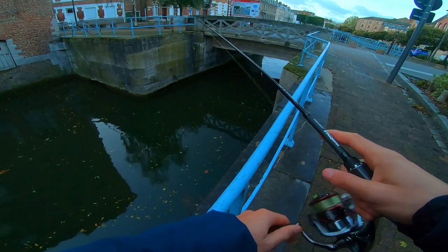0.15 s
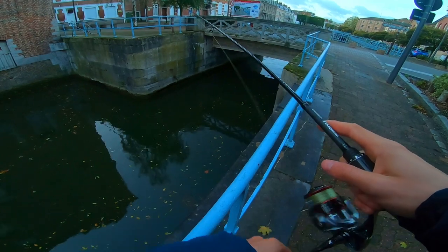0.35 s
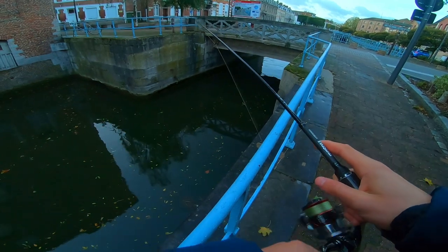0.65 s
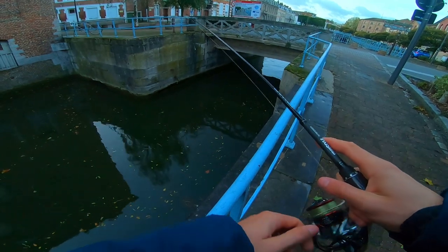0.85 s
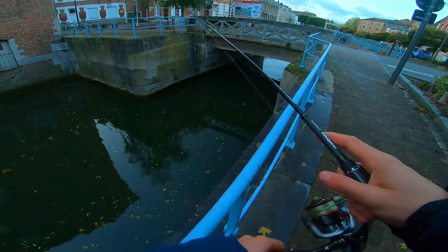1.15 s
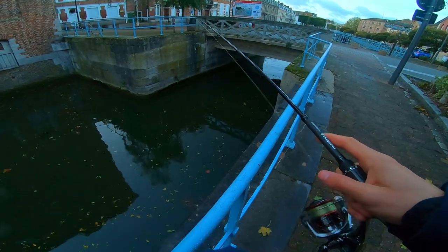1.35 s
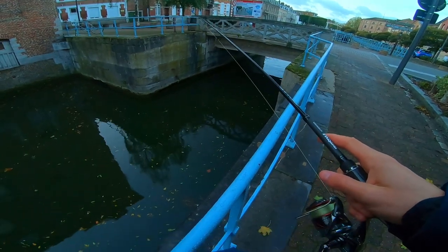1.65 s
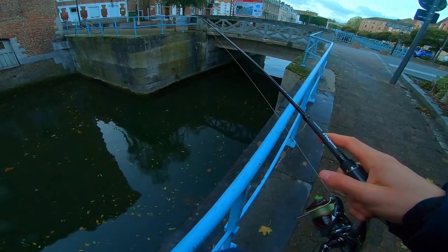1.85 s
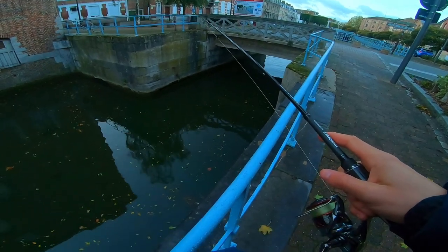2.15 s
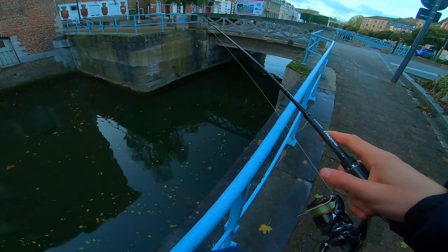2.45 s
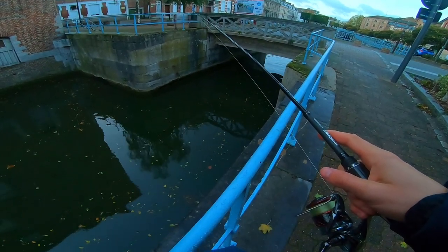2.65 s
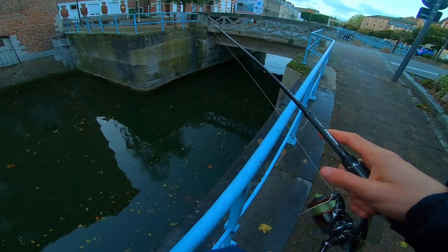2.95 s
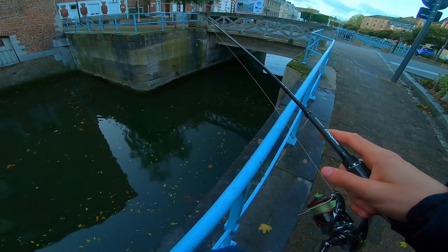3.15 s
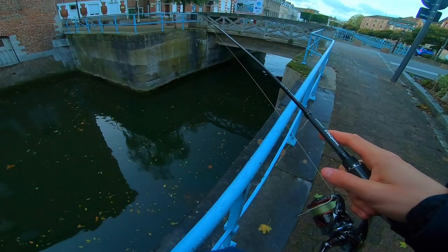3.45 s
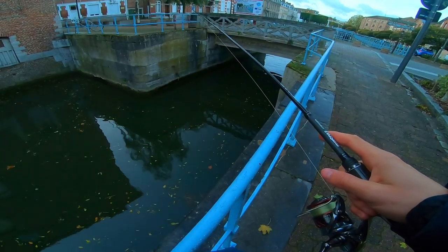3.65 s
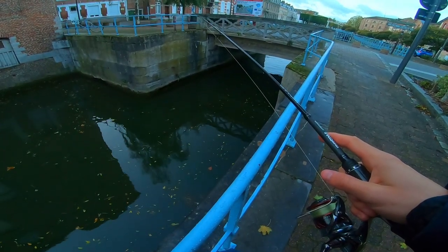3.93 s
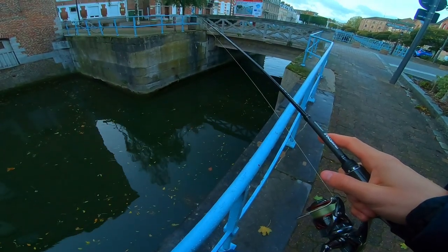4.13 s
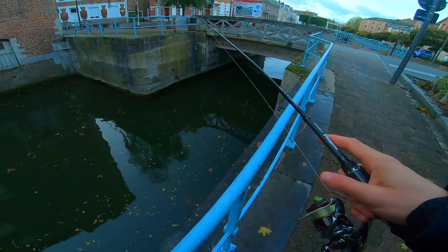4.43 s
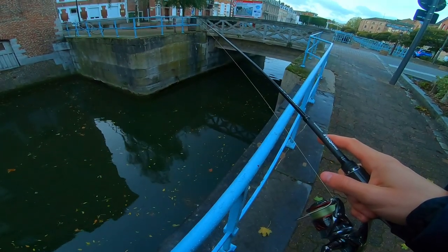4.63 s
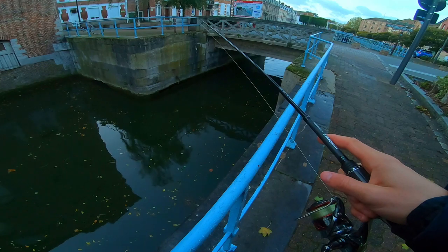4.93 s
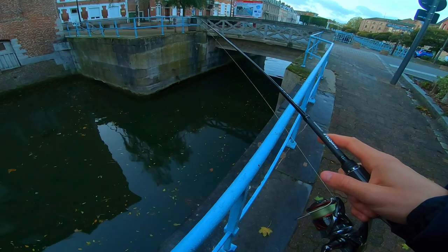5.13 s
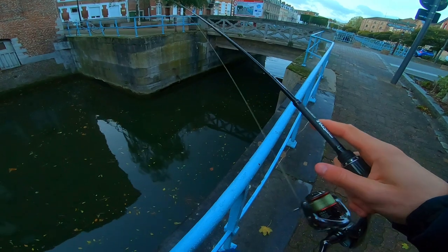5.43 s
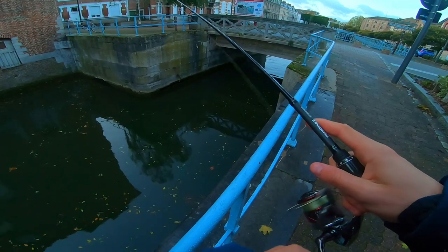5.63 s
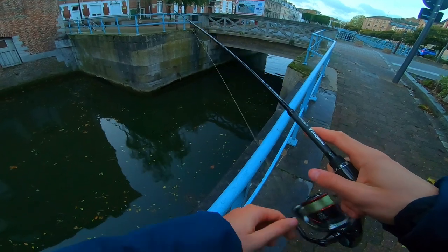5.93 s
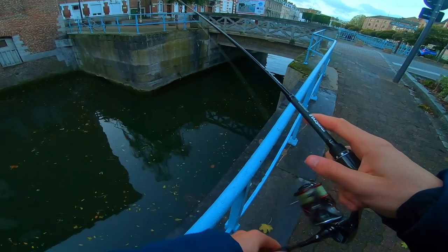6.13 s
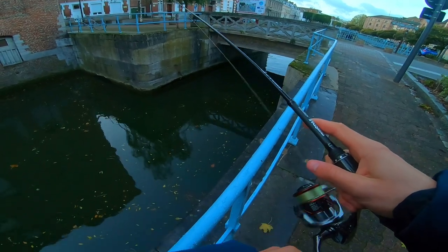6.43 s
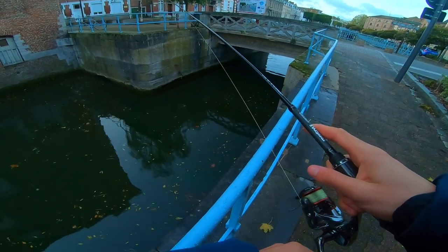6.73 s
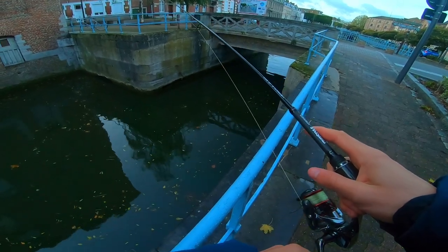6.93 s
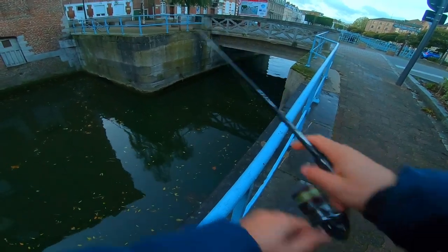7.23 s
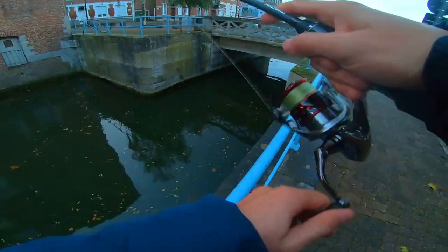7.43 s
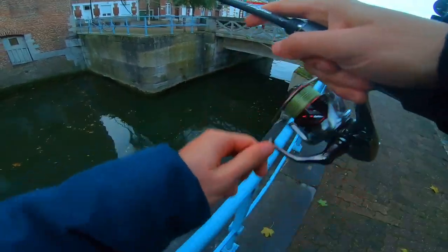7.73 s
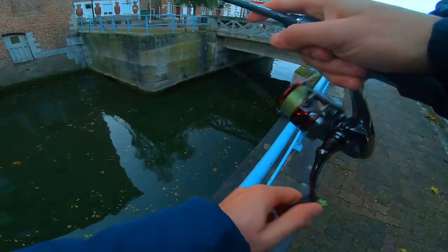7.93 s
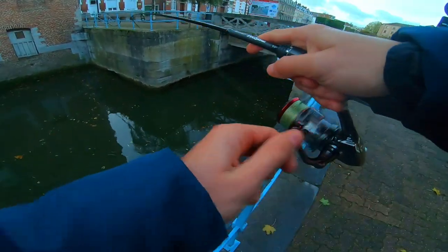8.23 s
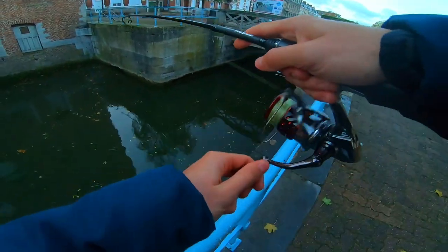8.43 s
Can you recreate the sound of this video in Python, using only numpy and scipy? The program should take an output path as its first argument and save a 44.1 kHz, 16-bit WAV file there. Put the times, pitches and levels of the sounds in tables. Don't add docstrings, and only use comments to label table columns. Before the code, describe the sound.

Outdoor wind buffets the microphone over low traffic rumble while a fishing reel whirs faintly, then rustles, rattles and grinds on a sudden strike.

```python
import sys
import numpy as np
from scipy import signal
from scipy.fft import rfft, irfft
from scipy.io import wavfile
from scipy.ndimage import uniform_filter1d

SR = 44100
rng = np.random.default_rng(int(sys.argv[2]) if len(sys.argv) > 2 else 0)


def dump(signal):
    limited = np.clip(np.atleast_2d(signal).T, -1, 1)
    pcm = np.round(limited * 32767).astype(np.int16)
    wavfile.write(sys.argv[1], SR, pcm)


def decibels_to_gain(level_db):
    exponent = np.asarray(level_db, float) / 20
    return 10 ** exponent


N = 378378
HZ = np.maximum(np.arange(N // 2 + 1) * SR / N, 1)

# frequency in Hz, width in Hz, level in dB.
GEARS = [(2090, 99, -2), (3325, 60, -1.5), (3620, 95, 3.5), (4270, 130, -3), (4630, 50, -7)]
# frequency in Hz, level in dB per Hz.
CRACKLE = [(3000, -19.5), (4500, -2.5), (6000, 1.5), (8500, 0), (10500, -12.5), (13000, -22), (16000, -32)]


def rms_one(x):
    return x / np.sqrt(np.mean(x ** 2) + 1e-20)


def in_time(rows):
    s, *columns = np.transpose(rows)
    return [np.interp(np.arange(N) / SR, s, column) for column in columns]


def within(rows, fade_s):
    t = np.arange(N) / SR
    inside_s = np.minimum(t - rows[0][0], rows[-1][0] - t)
    return np.clip(inside_s / fade_s + 1, 0, 1)


def over_hz(table):
    hz, *columns = np.transpose(table)
    return [np.interp(np.log(HZ), np.log(hz), column) for column in columns]


def drift(rate):
    r = np.exp(-2 * np.pi * rate / SR)
    return rms_one(signal.lfilter([1], [1, -2 * r, r * r], rng.standard_normal(N + SR))[SR:])


def ring(clicks, hz, t60):
    r = decibels_to_gain(-60 / (max(t60, .001) * SR))
    w = 2 * np.pi * hz / SR
    return signal.lfilter([0, np.sin(w)], [1, -2 * r * np.cos(w), r * r], clicks + 1e-18)


def grains(per_s, spread_db):
    sizes = decibels_to_gain(spread_db * np.minimum(rng.exponential(1, N), 5)) * rng.choice([-1, 1], N)
    clicks = rms_one(sizes * (rng.random(N) < per_s / SR))
    return clicks + .5 * rng.standard_normal(N)


def narrow_noise(hz, width_hz):
    lowpass = signal.butter(2, width_hz / 2, fs=SR, output="sos")
    shake = signal.sosfilt(lowpass, rng.standard_normal((2, N)))
    phase = 2 * np.pi * np.cumsum(hz + 0 * shake[0]) / SR
    return np.array([1, 1j]) @ rms_one(shake) * np.exp(1j * phase)


def through_ports(gain, first, second, near=0.):
    # frequency in Hz, likeness from 0 to 1,
    # lead of the right port in radians, left minus right in dB.
    port_pair = [(20, 0.88, 6.28, 0.5), (220, .995, 6.28, 0), (400, .965, 6.3, -.5), (700, 0.78, 6.4, -3),
                 (1000, 0.3, 5.5, 0), (1250, 0.1, 3, -0.5), (1570, 0.64, 0.5, -2.5), (2740, 0.64, 0, -4.5),
                 (4000, 0.75, -0.6, 0), (5200, 0.63, 0.96, -0.5), (6860, 0.25, 0.3, -2),
                 (7500, .42, 2.2, -1), (8480, .38, 1, -3), (9260, 0.1, 2.2, 0.5), (10140, 0.4, -5, 0)]
    alike, lead, balance_db = over_hz(port_pair)
    alike = np.clip(alike + near * (1 - alike) * alike, 0, 1)
    left = rfft(first) * decibels_to_gain(balance_db / 2)
    right = alike * np.exp(1j * lead) * rfft(first) + np.sqrt(1 - alike ** 2) * rfft(second)
    right = right * decibels_to_gain(-balance_db / 2)
    mid = np.sqrt(np.cosh(balance_db * np.log(10) / 20) + alike * np.cos(lead))
    pair = irfft(np.array([left, right]) * gain / mid, N)
    return pair / np.std(pair.mean(axis=0))


def swells(rows, edge_db_per_s):
    s, hold, *levels = np.transpose(rows)[..., None]
    away_s = np.maximum(np.abs(np.arange(0, N, 64) / SR - s) - hold / 2, 0)
    return [decibels_to_gain(db - edge_db_per_s * away_s) for db in levels]


def spread(coarse):
    return np.interp(np.arange(N), np.arange(0, N, 64), coarse)


def level_of(gains, rest_db):
    return 10 * np.log10(spread(np.sum(gains ** 2, axis=0)) + decibels_to_gain(2 * rest_db))


def winding():
    # middle in seconds, hold in seconds, level in dB, top pitch in Hz.
    whistles = [(.15, .01, -67, 7150), (0.189, .02, -59.5, 7800), (.3, 0.0494, -60, 7540),
                (0.4, 0.082, -60, 7250), (0.553, 0.019, -67, 7050), (0.719, 0.05, -67, 7200),
                (.81, .04, -69, 7250), (.86, 0.03, -68, 7500), (0.949, .04, -67, 7440),
                (1.01, .04, -63, 7200), (1.176, 0.09, -66, 7150), (5.569, .02, -65, 8150),
                (5.605, .02, -70, 7500), (5.693, .09, -67, 7050), (5.79, 0.07, -67, 7050),
                (5.88, .04, -68, 7100), (5.98, 0.06, -66.5, 7080), (6.06, .03, -62, 7300),
                (6.105, .02, -64, 8300), (6.135, 0.03, -59.5, 7600), (6.197, .02, -63, 7400),
                (6.25, .03, -64, 7200)]
    # middle in seconds, hold in seconds, level in dB, pitch in
    # Hz.
    rotor_rubs = [(.06, 0.09, -57, 4550), (.21, .04, -61, 4200), (.33, .04, -59.5, 4150),
                  (.73, .04, -56, 4250), (1.14, .02, -62.5, 4450), (1.21, 0.054, -59.5, 4550),
                  (1.28, .06, -57.5, 4480), (1.36, .03, -55, 4400), (1.41, 0.035, -60, 4550),
                  (5.55, 0.046, -64, 4200), (5.77, 0.036, -58.5, 4520), (5.83, .05, -59, 4500),
                  (5.89, .03, -60, 4500), (6.01, 0.029, -58, 4400), (6.06, .04, -59, 4400)]
    # start in seconds, end in seconds.
    turning = [
        (0, 1.5),
        (5.45, 6.35),
    ]
    # frequency in Hz, level in dB per Hz.
    ring_air = [(2500, -28), (4000, 10), (6500, -19), (9000, -14), (10500, -15), (12500, -20), (13200, -50)]
    rest_hz, pitch_law = 7050, 0.67

    air = through_ports(decibels_to_gain(over_hz(ring_air)[0]), grains(2000, spread_db=4.0), grains(2000, spread_db=5.0))

    s, hold, db, top_hz = np.transpose(whistles)
    pulls, = swells(np.transpose([s, hold, db]), edge_db_per_s=169.5)
    tightness = (pulls / decibels_to_gain(db)[:, None]) ** pitch_law
    hz = rest_hz + spread(np.max((top_hz - rest_hz)[:, None] * tightness, axis=0))
    whistle_db = level_of(pulls, rest_db=-79)

    s, hold, db, rub_hz = np.transpose(rotor_rubs)
    rubs, = swells(np.transpose([s, hold, db]), edge_db_per_s=220)
    rub_db = level_of(rubs, rest_db=-71)
    rub_hz = spread(rub_hz[np.argmax(rubs, axis=0)])

    whistle = narrow_noise(hz + 83.0 * drift(39.8), 450.0)
    upper = narrow_noise(8450. + 160.0 * drift(20.0), 300.)
    whistle = whistle + decibels_to_gain(-9 + 3.0 * drift(13)) * upper
    ports = [[.8], [1.74 * np.exp(1j * 2.27)]]
    whistle = decibels_to_gain(whistle_db - 1.5 + 3.4 * drift(55)) * np.real(whistle * ports)
    rub = decibels_to_gain(rub_db - 7.0 + 3.0 * drift(45)) * narrow_noise(rub_hz + 90 * drift(15.0), 260.).real
    rub = rub * decibels_to_gain([[-1.5], [1.5]])
    hush = decibels_to_gain(0.44 * (whistle_db + 55.0) - 68) * air
    turns = sum(within([(start,), (end,)], fade_s=.1) for start, end in turning)
    return turns * (whistle + rub + hush)


def clicker():
    # time in seconds, strength in dB,
    # upper modes in dB, body in dB, spring pitch in Hz.
    slipping_teeth = [(7.2713, -45, 16, -5, 7000), (7.2776, -36, 2, -3, 5300), (7.3714, -29, -1, -12, 6200),
                      (7.375, -38, 0, -6, 5200), (7.3782, -30, 2, -14, 5800), (7.3816, -29, 5, -9, 6100),
                      (7.3847, -32, 6, -8, 5800), (7.3874, -23, -3, -20, 5800), (7.3901, -23, 0, -20, 5900),
                      (7.3931, -16.5, -8, -26, 5950), (7.3962, -22, -4, -20, 5750),
                      (7.3992, -24, -3, -18, 5800), (7.4026, -30, 2, -10, 5300), (7.4059, -29, 4, -8, 5400),
                      (7.4094, -30, 10, -8, 5500), (7.4129, -30, 5, -10, 5500), (7.4169, -39, 14, -4, 5500),
                      (7.4201, -31, 7, -8, 5500), (7.4243, -29, 7, -14, 5500), (7.4293, -23, 2, -20, 5900),
                      (7.4355, -22.5, -3, -18, 5600), (7.4443, -31, 3, -10, 5600),
                      (7.4455, -31, 3, -10, 5500), (7.4514, -19.5, -3, -6, 6350),
                      (7.809, -26, 0, -25, 5800)]
    # share of the spring pitch, level in dB, t60 in seconds.
    spring_low = [(.95, -4, 0.008), (1.0, -3, 0.009), (1.065, -3.5, 0.007)]
    # frequency in Hz, level in dB, t60 in seconds.
    spring_high = [(7250, -6, 0.0061), (8400, -5, 0.0063), (9300, -6.5, 0.007), (10150, -9.5, 0.0053),
                   (11500, -15, .004), (12600, -15, 0.0035), (13700, -15, .0035), (14800, -16, 0.0034)]
    # frequency in Hz, level in dB, t60 in seconds.
    spool = [(1230, -14, 0.0053), (2050, -4.5, 0.008), (2900, -8, .005), (3700, -1, 0.005),
             (4630, -6, 0.006)]
    buzz_s, buzz_db, snap_cycles, pan_db = 0.0012, -20.0, 4.6, 0.5

    out, teeth = np.zeros((2, N)), np.zeros(N)
    tap = signal.unit_impulse(SR // 40)
    for s, strength_db, high_db, body_db, spring_hz in slipping_teeth:
        at = round((s - .0004) * SR)
        teeth[at] = decibels_to_gain(strength_db + buzz_db)
        spring = [(share * spring_hz, db, t60) for share, db, t60 in spring_low]
        for modes, share_db in ((spring, 0), (spring_high, high_db), (spool, body_db)):
            for hz, db, t60 in modes:
                left, right, turn, detune = rng.standard_normal(4)
                hz = hz * (1 + 0.0073 * detune)
                snap = ring(tap, hz, snap_cycles / hz) * 2.58 / snap_cycles
                rung = ring(snap, hz, t60)
                sign = np.sign(turn + 9 * (modes is spring))
                uneven_db = 1.3 * np.array([[left], [right]])
                gain = sign * decibels_to_gain(strength_db + share_db + db - 5.5 + uneven_db)
                out[:, at:at + len(tap)] += gain * [np.roll(rung, int(hz < 1e4)), rung]
    dying = signal.lfilter([1], [1, -np.exp(-1 / (buzz_s * SR))], teeth + 1e-18)
    buzz = dying * through_ports(decibels_to_gain(over_hz(CRACKLE)[0]), *rng.standard_normal((2, N)))
    out = signal.sosfilt(signal.butter(1, 9500., fs=SR, output="sos"), out)
    return out * decibels_to_gain([[pan_db], [-pan_db]]) + buzz


def hauling():
    # time in seconds, gear level in dB.
    effort = [(7.55, -64), (7.66, -53), (7.78, -48), (7.83, -59), (7.92, -47), (7.97, -56), (8.15, -49),
              (8.25, -58), (8.52, -64)]
    # time in seconds, level in dB.
    tension = [(7.55, -62), (7.62, -60), (7.68, -51), (7.79, -51.5), (7.84, -62), (7.92, -54), (7.98, -62),
               (8.17, -57), (8.25, -56.5), (8.36, -55.5), (8.47, -61), (8.55, -63)]
    # frequency in Hz, level in dB per Hz.
    taut_line = [(3500, -18), (4800, -9), (5300, 0), (5750, -2), (6200, 2.5), (6600, -5), (7150, -8),
                 (9000, -11.5), (10300, -17), (11000, -27), (14700, -33), (15300, -60.5)]
    gears_db, = in_time(effort)
    line_db, = in_time(tension)
    body = sum(decibels_to_gain(db) / (1 + 1j * (HZ - hz) / (width / 2)) for hz, width, db in GEARS)
    body = body / (1 + (HZ / 6900.0) ** 6) ** .5
    grind = through_ports(body, grains(1200, spread_db=2.0), grains(1200, spread_db=5.0), near=1.0)
    hiss_gain = decibels_to_gain(over_hz(taut_line)[0])
    hiss = through_ports(hiss_gain, grains(2500, spread_db=3.5), grains(2500, spread_db=1.0), near=.7)
    grind = decibels_to_gain(gears_db - 2.5 + 1.4 * drift(25)) * grind
    hiss = decibels_to_gain(line_db + 2.0 * drift(45)) * hiss
    return within(effort, fade_s=0.088) * (grind + hiss)


def catches():
    # time in seconds, level in dB.
    worn_teeth = [(7.569, -50), (7.604, -51), (7.634, -47), (7.692, -42), (7.702, -46), (7.72, -47),
                  (7.742, -47), (7.756, -47), (7.819, -43), (7.846, -39), (7.878, -45), (7.905, -52),
                  (7.931, -37), (7.96, -43), (7.978, -48), (8.008, -54), (8.02, -48), (8.053, -37),
                  (8.099, -50), (8.116, -52), (8.147, -52), (8.156, -38), (8.182, -49), (8.214, -51),
                  (8.248, -52), (8.292, -56), (8.314, -57), (8.405, -50), (8.44, -46)]
    s, db = np.transpose(worn_teeth)
    out = np.zeros(N)
    for hz, width, mode_db in GEARS:
        clicks = np.zeros(N)
        strike_db = db + mode_db - 7.0 + 2.2 * rng.standard_normal(len(s))
        clicks[np.round(s * SR).astype(int)] = decibels_to_gain(strike_db)
        out += ring(clicks, hz, 1.2 / width)
    bandpass = signal.butter(2, [1500., 5000.], "band", fs=SR, output="sos")
    return signal.sosfilt(bandpass, out) * decibels_to_gain([[-1.0], [1.2]])


def knocks():
    # time in seconds, peak in dB,
    # frequency in Hz, t60 in seconds, left minus right in dB.
    handle_knocks = [(5.283, -53, 7000, .014, 0), (5.296, -50, 6500, .014, 0), (5.308, -50, 5900, .014, 0),
                     (7.2815, -37, 3600, .006, -3), (7.2835, -37, 2100, .012, -3),
                     (7.287, -37, 1100, .015, -3), (7.2875, -37, 3300, .006, -3),
                     (7.294, -41, 1400, .012, -3), (7.326, -43, 4650, .012, -7),
                     (7.328, -44, 6000, .008, -4), (7.334, -46, 7600, .01, -3),
                     (7.355, -36, 4350, .012, -5), (7.3575, -40, 5100, .006, -2),
                     (7.36, -39, 3550, .01, -2), (7.3715, -35, 900, .015, -3), (7.459, -38, 3000, .012, -3),
                     (7.4615, -39, 7200, .006, -2), (7.466, -40, 1500, .015, -3),
                     (7.475, -42, 2500, .009, -4), (7.4885, -30, 2100, .009, -9),
                     (7.4885, -29, 930, .014, -6), (7.4891, -25.5, 1570, .015, -12),
                     (7.662, -41, 4000, .012, -4), (7.777, -40, 3400, .0025, -2),
                     (8.07, -43, 4300, .01, -2), (8.455, -47, 2060, .11, -4), (8.481, -43, 4350, .015, -2)]
    out = np.zeros((2, N))
    for s, db, hz, t60, pan_db in handle_knocks:
        at = round(s * SR)
        rung = ring(signal.unit_impulse(SR // 10), hz, t60)[:N - at]
        contact = signal.butter(4, min(1.34 * hz, 9000.), fs=SR, output="sos")
        rung = signal.sosfilt(contact, rung)
        out[:, at:at + len(rung)] += rung * decibels_to_gain([[db + pan_db / 2], [db - pan_db / 2]])
    return out


def sleeve():
    # middle in seconds, hold in seconds, level in dB.
    sweeps = [
        (.33, 0.12, -57),
        (1.18, 0.066, -55.5),
        (7.285, 0.015, -44.5),
        (7.38, 0.043, -40.5),
        (7.46, 0.02, -38.5),
        (7.53, 0.034, -54),
    ]
    # middle in seconds, hold in seconds, level in dB.
    stretches = [
        (7.28, 0.018, -56),
        (7.328, 0.029, -55.5),
        (7.395, .03, -42.5),
        (7.44, 0.033, -48),
        (7.49, .04, -56),
    ]
    # frequency in Hz, level in dB per Hz.
    cloth = [(350, -22.5), (800, 4), (1500, -3), (2500, -3), (4000, -2.5), (6000, -16.5), (10000, -39),
             (12500, -60)]
    pan_db = -2.5
    drag_db = level_of(*swells(sweeps, edge_db_per_s=262), -99)
    crackle_db = level_of(*swells(stretches, edge_db_per_s=330), -99)
    drag = through_ports(decibels_to_gain(over_hz(cloth)[0]), grains(2500, spread_db=3.0), grains(1500, spread_db=0.5))
    crackle = through_ports(decibels_to_gain(over_hz(CRACKLE)[0]), grains(5000, spread_db=0.0), grains(3000, spread_db=1.5))
    drag = decibels_to_gain(drag_db + 1.9 * drift(27)) * drag * decibels_to_gain([[pan_db], [-pan_db / 2]])
    return drag + decibels_to_gain(crackle_db + 0.5 + 3.8 * drift(30)) * crackle


def eddies(low_hz, high_hz):
    band = signal.butter(2, [low_hz, high_hz], "band", fs=SR, output="sos")
    x = signal.sosfilt(band, rng.standard_normal(N + SR))[SR:]
    x = signal.sosfilt(signal.butter(2, 1.34 * high_hz, fs=SR, output="sos"), x)
    power = uniform_filter1d(uniform_filter1d(x ** 2, size=3000), size=3000)
    return x / np.sqrt(power)


def buffets():
    # time in seconds, peak in dB, width in ms,
    # port (1 left, -1 right), sense (1 push, -1 suction).
    thumps = [(0.368, -16.5, 14, 1, 1), (2.012, -11.5, 11.4, 1, -1), (2.749, -10.5, 8.7, 1, 1),
              (6.222, -16, 12.5, 1, 1), (6.485, -6.5, 3.8, 1, 1), (6.547, -10, 6.5, 1, -1),
              (6.698, -9.5, 8.1, 1, 1), (6.88, -8, 6.2, 1, -1), (6.967, -12, 6.1, 1, -1),
              (7.076, -16, 3.5, 1, 1), (7.152, -23, 4.5, 1, 1), (7.219, -11.5, 4.2, 1, 1),
              (7.342, -16, 3.8, 1, 1), (7.55, -9, 2.14, 1, 1), (7.606, -6, 5.6, 1, 1),
              (7.737, -9.5, 3.05, 1, -1), (7.913, -9, 12.6, 1, 1), (7.938, -16, 1.9, 1, 1),
              (8.001, -9.5, 6, -1, -1), (8.013, -11, 6.5, 1, 1), (8.031, -14.5, 2.8, 1, 1),
              (8.073, -11, 7.6, 1, -1), (8.135, -12, 10.5, -1, 1), (8.142, -9, 3.2, 1, -1),
              (8.161, -5, 4.6, 1, -1), (8.335, -7.5, 9.7, 1, -1)]
    out, t = np.zeros((2, N)), np.arange(N) / SR
    for s, db, width_ms, port, sense in thumps:
        x = (t - s) / (0.00069 * width_ms)
        out[int(port < 0)] += np.sign(sense) * decibels_to_gain(db - 2.5) * (1 - x ** 2) * np.exp(-x ** 2 / 2)
    return out


def wind():
    # middle in seconds, hold in seconds, left level in dB, right level in dB.
    gusts = [(0.044, 0.14, -34, -37), (0.31, 0.055, -27, -28.5), (0.66, 0.036, -39, -32),
             (0.818, 0.05, -28, -34), (1.1, .04, -43, -35), (1.341, 0.055, -28, -37),
             (1.513, 0.13, -35, -35), (1.726, 0.03, -25, -39), (1.985, 0.027, -33, -36),
             (2.2, .05, -46, -50), (2.535, .05, -28.5, -40), (2.647, 0.053, -30, -32),
             (2.802, 0.078, -26, -40), (3.17, 0.045, -45, -40), (3.497, 0.13, -26.5, -39),
             (3.847, .05, -36, -49), (4.06, 0.026, -29.5, -35), (4.4, .04, -43, -50),
             (5.052, 0.055, -47, -46), (5.553, 0.076, -35.5, -38), (5.913, 0.049, -38, -44.5),
             (6.205, 0.13, -26, -40), (6.529, 0.1, -21.5, -31), (6.8, 0.3, -20.5, -33),
             (7.193, 0.15, -24, -41), (7.368, 0.022, -20.5, -24), (7.538, 0.084, -18.5, -38),
             (7.736, 0.11, -24, -30.5), (8.037, 0.28, -21, -27.5), (8.36, 0.035, -27.5, -47)]
    # time in seconds, level in dB.
    breeze = [(0, -40), (1.6, -37), (2.2, -51), (4.2, -59), (4.6, -62.5), (5.9, -57), (6.4, -37),
              (8.3, -41), (8.58, -45)]
    lee_db = -56
    turn_db, pop_db = -23.5, 3.0
    out = []
    for gains, rest_db in zip(swells(gusts, edge_db_per_s=144), (in_time(breeze)[0], lee_db)):
        level_db = level_of(gains, rest_db)
        share = np.clip(0.39 * decibels_to_gain(1.2 * (level_db - turn_db)), 0, 1.1)
        large = eddies(23.6, 54.2)
        small = share * decibels_to_gain(pop_db * drift(16.4)) * eddies(45.0, 152.0)
        out.append(decibels_to_gain(level_db - 1.0) * (large + small))
    left, right = out + buffets()
    return np.array([left + .04 * right, right + 0.08 * left])


def traffic():
    # time in seconds, hiss in
    # dB.
    hiss_swell = [(0.0, -62.5), (1.0, -66.5), (2.34, -68), (3.03, -69.5), (3.56, -65.5), (4.08, -66),
                  (4.85, -68), (5.85, -64.5), (6.4, -62.5), (6.93, -68), (7.29, -67), (7.48, -59.5),
                  (8.46, -62), (8.58, -73)]
    # frequency in Hz, level in dB per Hz.
    rumble = [(15, 0), (30, -1), (65, 0), (110, -3), (160, -4.5), (225, -6.5), (260, -5.5), (330, -8),
              (420, -10), (440, -12), (520, -15.5), (700, -22), (1000, -30.5), (1400, -50), (3000, -120)]
    # frequency in Hz, level in dB per Hz.
    roar = [(600, -16), (900, 1.5), (1240, -4), (1600, 0.5), (2400, -3), (3300, -5.5), (4200, -13.5),
            (6000, -51), (9000, -80.5)]
    # frequency in Hz, level in dB per Hz.
    hiss = [(2800, -9.5), (4000, -1), (4600, -0.5), (5600, -1), (7000, -6), (9100, -10.5), (10300, -22),
            (11000, -29.5), (11600, -40), (13000, -65), (16000, -77.5)]
    # rumble, roar and hiss in dB.
    wash_excess = [6, 0.35, 5]
    hiss_db, = in_time(hiss_swell)
    rumble_db = -39.5
    roar_db = -53.5 + 0.14 * (hiss_db + 66.5)
    out = 0
    for spectrum, whole_db, level_db in zip((rumble, roar, hiss), wash_excess, (rumble_db, roar_db, hiss_db)):
        wash = through_ports(decibels_to_gain(over_hz(spectrum)[0]), *rng.standard_normal((2, N)))
        out = out + decibels_to_gain(level_db + whole_db + 0.51 * drift(4.0)) * wash
    return out


def scene():
    reel = winding() + clicker() + hauling() + catches() + knocks()
    return reel + sleeve() + wind() + traffic()


def low_pass(x):
    return signal.sosfilt(signal.butter(12, 15720, fs=SR, output="sos"), x)


def record(dry):
    duck_from_db, duck_share, duck_s = -33, 0.1, 0.52
    level_db = 10 * np.log10(uniform_filter1d(dry ** 2, int(duck_s * SR), axis=1) + 1e-12)
    ducked = dry * decibels_to_gain(-duck_share * np.maximum(level_db - duck_from_db, 0))
    mix = signal.sosfilt(signal.cheby2(12, 60, 16000, fs=SR, output="sos"), ducked)
    return low_pass(mix)


dry = scene()
out = record(dry)
dump(out)
```